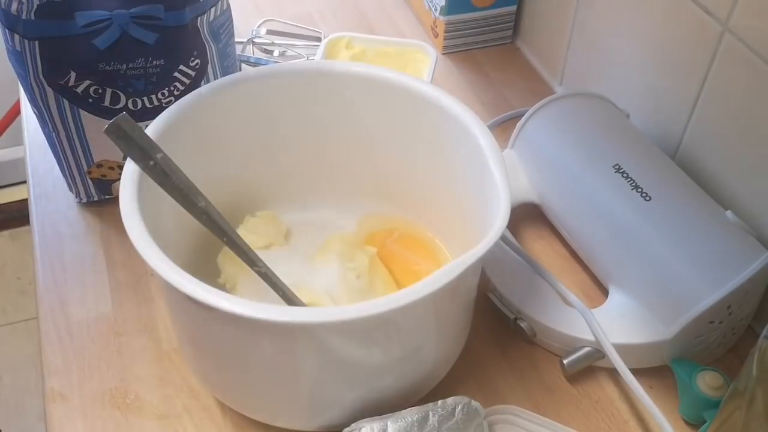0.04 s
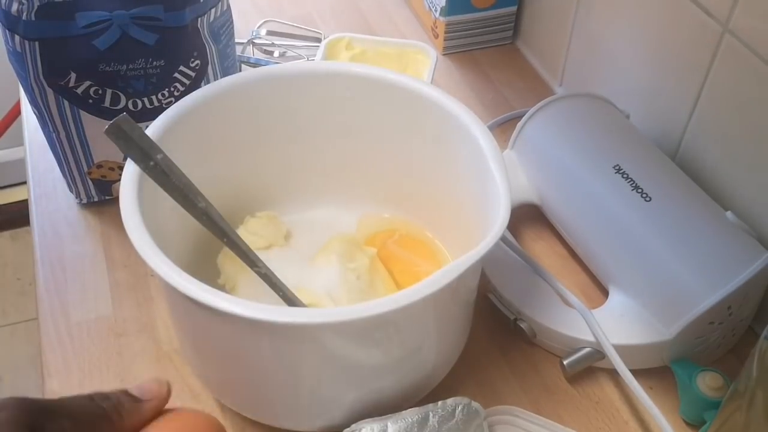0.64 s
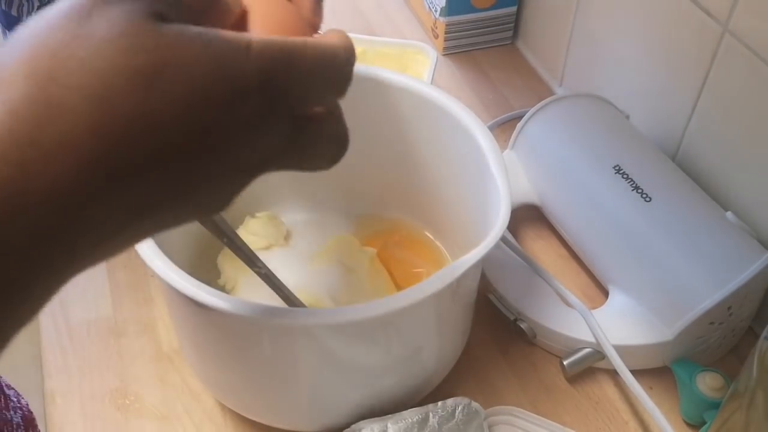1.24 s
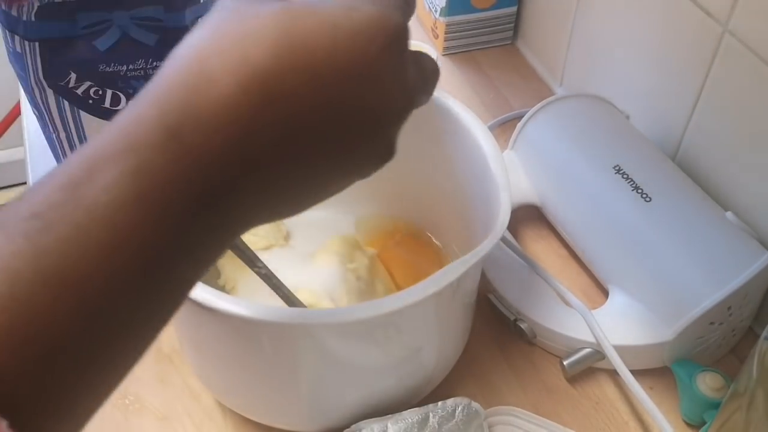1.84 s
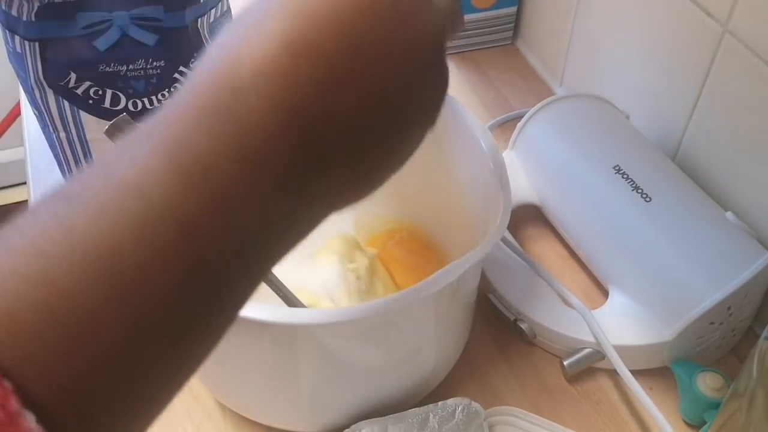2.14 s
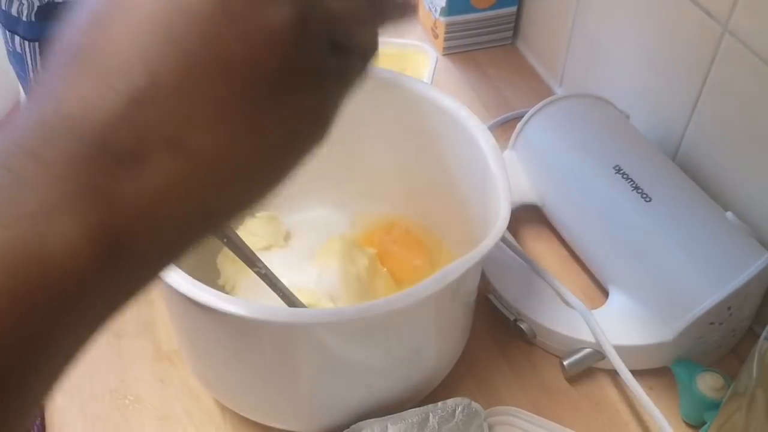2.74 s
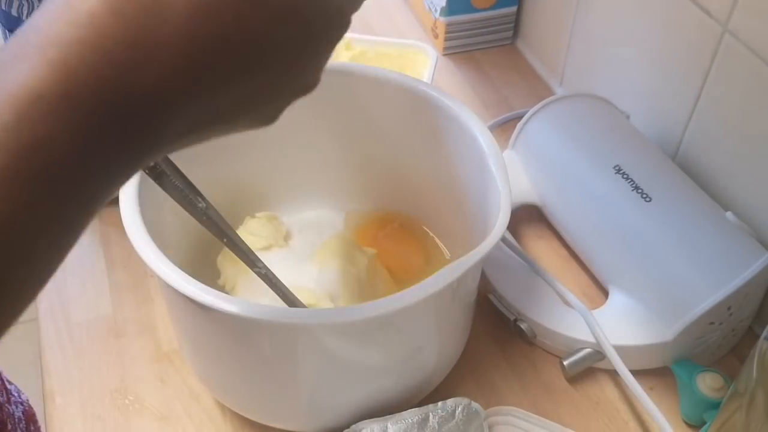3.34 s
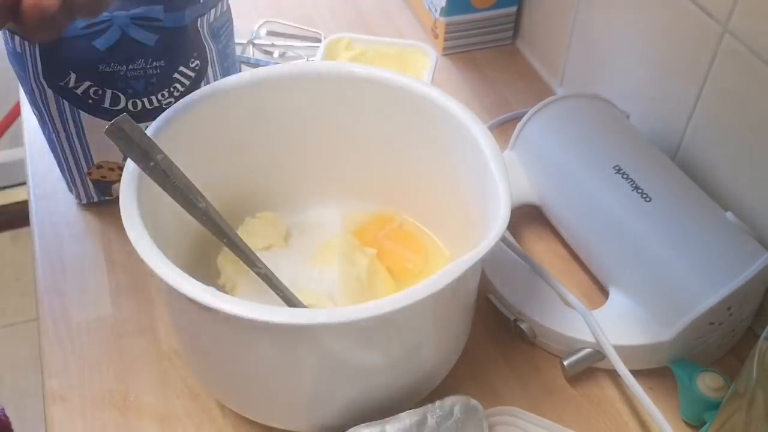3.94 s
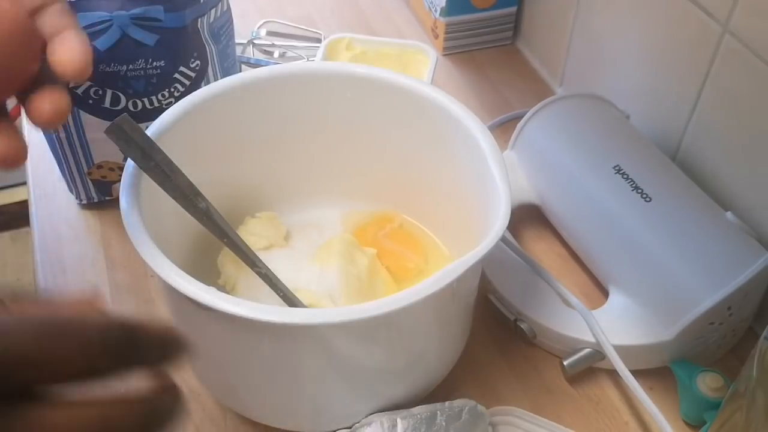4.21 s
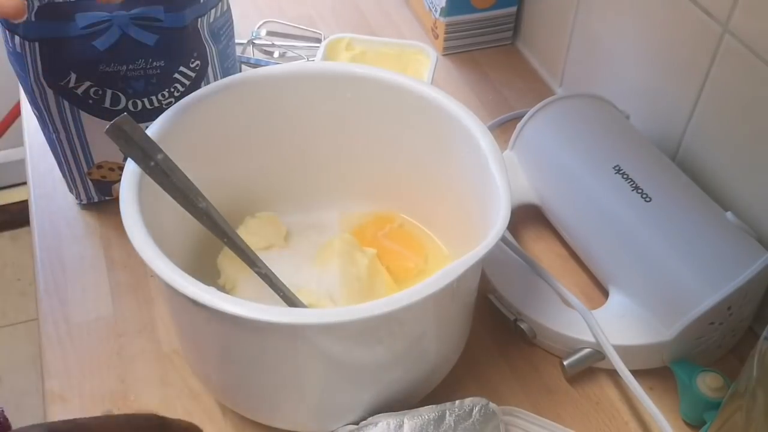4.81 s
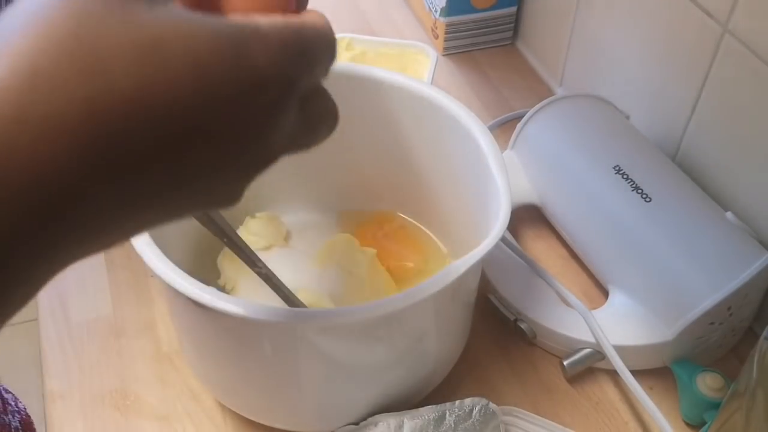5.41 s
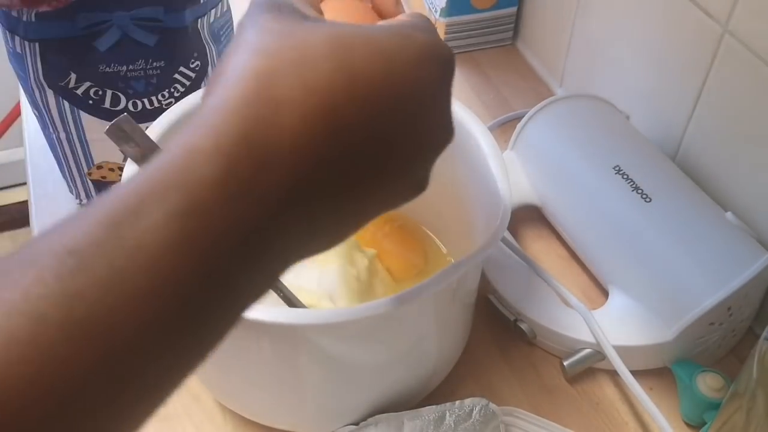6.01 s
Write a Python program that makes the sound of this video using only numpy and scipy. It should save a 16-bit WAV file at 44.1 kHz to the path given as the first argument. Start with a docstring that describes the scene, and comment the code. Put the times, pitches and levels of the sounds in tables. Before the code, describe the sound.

An egg hits a plastic bowl with a hard crack and a short hollow thud. Fine crumbling builds to a few crisp shell snaps, followed by a faint wet plop. Shells then rustle and crunch in an egg carton before another egg strikes the bowl and starts to break apart. The microphone is close, in a quiet kitchen with a short echo and a faint low rumble of movement.

```python
"""At a kitchen counter, close up, two eggs are knocked on the rim of a plastic mixing bowl, which rings and
rocks. Thumbs pry the first shell apart, the egg slops out, the halves crunch into the carton and the next
egg is taken. Every crackle is a burst of tiny fractures that also rings a small hollow. A short room tail
follows; underneath lie faint squeaks, room air and the low rumble of moving arms."""
import sys
import numpy as np
from scipy import signal
from scipy.fft import rfft, irfft
from scipy.io import wavfile

SR = 44100
rng = np.random.default_rng(int(sys.argv[2]) if len(sys.argv) > 2 else 0)


def transcribe(u):
    """Save the signal u as a 16-bit wav file named by the first command-line argument.

    u: samples, shape (n,) or (channels, n), limited to [-1, 1]; the rate is SR.
    q: integer samples, one column per channel.
    """
    v = np.clip(np.atleast_2d(u).T, -1, 1)
    q = np.round(v * 32767).astype(np.int16)
    wavfile.write(sys.argv[1], SR, q)


N = 271656

# The tone of one eggshell fracture. Each row: frequency in Hz, gain in dB.
SHELL_COLOUR = [(100, -16), (400, -17), (700, -20), (1100, -2), (2000, -13), (3200, -2.5), (4700, 0),
                (6200, -2.5), (7500, -3), (10000, -4.5), (12500, -13), (15000, -17.5)]


def amp(db):
    """Decibels to gain."""
    return 10 ** (np.asarray(db) / 20)


def curve_at(points, hz):
    """A curve's value on a log-frequency axis."""
    point_hz, value = np.transpose(points)
    return np.interp(np.log(hz + 1), np.log(point_hz), value)


def add(mix, start, sound):
    """Lays a sound into the mix at a start in seconds."""
    part = mix[max(round(start * SR), 0):][:len(sound)]
    part += sound[:len(part)]


def coloured(x, gain_db):
    """Minimum-phase EQ, with one gain for each spectrum bin of x."""
    log_gain = np.log(amp(np.r_[gain_db, gain_db[-2:0:-1]]))
    return irfft(rfft(x) * np.exp(np.conj(signal.hilbert(log_gain)))[:len(gain_db)])


def band_energy(x, lo_hz, hi_hz):
    """Energy of x between two frequencies."""
    hz = np.fft.rfftfreq(len(x), 1 / SR)
    return 2 * np.sum(abs(rfft(x)[(hz > lo_hz) & (hz < hi_hz)]) ** 2) / len(x) + 1e-20


def noise(colour):
    """Steady noise of rms 1 with a given spectrum."""
    gain = amp(curve_at(colour, np.fft.rfftfreq(N, 1 / SR)))
    x = irfft(rfft(rng.standard_normal(N)) * gain, N)
    return x / x.std()


def room_air(level_db=-59):
    """The bed of a quiet kitchen, alike on both sides in the bass only."""
    # Each row: frequency in Hz, relative noise level in dB.
    colour = [(12, -28.5), (20, 4), (81, -13.5), (138, -7), (172, -19), (248, -24), (285, -30),
              (377, -20.5), (422, -34), (780, -32), (1260, -32.5), (2750, -32), (6010, -43), (11100, -42.5),
              (16000, -56)]
    side = signal.sosfilt(signal.butter(2, 350, "high", fs=SR, output="sos"), noise(colour))
    return amp(level_db) * (noise(colour) + np.array([side, -side]))


def fractures(length, unevenness_db, hardness, size=4096):
    """A burst of tiny breaks of very unequal size that swells fast and dies within about its length."""
    progress = np.arange(size) / SR / max(length, .001)
    breaks = rng.standard_normal(size) * amp(unevenness_db * np.minimum(rng.standard_normal(size), 2.5))
    breaks *= progress ** .3 * np.exp(-progress ** 2)
    for _ in range(hardness):
        # a hard, clean break has no pitch: each pass evens out its spectrum and keeps it short
        spectrum = rfft(breaks)
        breaks = irfft(spectrum / np.sqrt(abs(spectrum) + 1e-12)) * np.exp(-(progress / 2) ** 4)
    return breaks


def crunch(length, crackle_db, hollow_db, hollow_hz, colour_db, unevenness_db, hollow_q, hardness):
    """Fractures radiate directly as treble crackle and ring the hollow behind them in the mids."""
    breaks = fractures(length, unevenness_db, hardness)
    hz = np.fft.rfftfreq(len(breaks), 1 / SR) + 1
    crackle = coloured(breaks, colour_db(hz))
    # the more closed the hollow, the more it outweighs the crackle and the sharper it rings
    q = hollow_q * 2 ** ((hollow_db - crackle_db) / 22)
    detuning = q * (hz / hollow_hz - hollow_hz / hz)
    hollow = coloured(breaks, np.maximum(-20 * np.log10(1 + detuning ** 2), -70))
    crackle *= amp(crackle_db) / np.sqrt(band_energy(crackle, 3800, 15000))
    hollow *= amp(hollow_db) / np.sqrt(band_energy(hollow, 900, 3400))
    return (crackle + hollow) * np.sqrt(length * SR)


def handling(rows, colour, gain_db, unevenness_db, hollow_q, bright_db, flake_db=4.5):
    """A run of crunches; each flake has resonances of its own and one bright peak."""
    out = np.zeros(N)
    flake_hz = np.geomspace(600, 16000, 40)
    for start, length, crackle_db, hollow_db, hollow_hz, bright_hz in rows:
        flake = np.c_[flake_hz, flake_db * rng.uniform(-1, 1, len(flake_hz))]

        def colour_db(hz):
            peak_db = bright_db * np.exp(-(np.log2(hz / bright_hz) / 0.64) ** 2)
            return curve_at(colour, hz) + curve_at(flake, hz) + peak_db
        add(out, start, crunch(length, crackle_db, hollow_db, hollow_hz, colour_db,
                               unevenness_db, hollow_q, hardness=0))
    return amp(gain_db) * out


def snapping(snaps, grips):
    """Crunch rows for the loud snaps: each takes the hollow pitch and bright peak of the latest grip."""
    grip_changes = [grip[0] for grip in grips[1:]]
    return [(*snap, *grips[np.searchsorted(grip_changes, snap[0])][-2:]) for snap in snaps]


def crumbling(grips, spread_db, overlap, ends_db, count, spread_octaves=.1):
    """Rows of small random crunches through each grip, strongest midway where fingers press hardest."""
    rows = []
    for start, length, crackle_db, hollow_db, hollow_hz, bright_hz in grips:
        for k, (when, crackle, hollow, pitch) in enumerate(rng.uniform(-1, 1, (count, 4))):
            progress = (k + .5 + when / 2) / count
            press_db = ends_db * (2 * progress - 1) ** 2
            rows.append((start + progress * length, overlap * length / count,
                         crackle_db + press_db + spread_db * crackle,
                         hollow_db + press_db + spread_db * hollow,
                         hollow_hz * 2 ** (spread_octaves * pitch), bright_hz))
    return rows


def egg_carton():
    """Shells are pressed into the carton and an egg is pulled out: snaps, crumbling and dull bumps."""
    # The tone of one fracture. Each row: frequency in Hz, gain in dB.
    colour = [(100, -8), (400, -5.5), (650, -9.5), (1100, -0.5), (2000, -3.5), (3400, -0.5), (5000, 0.5),
              (7000, -5), (10000, -2.5), (12500, -11.5), (15000, -19.5)]
    # Shells and fingers in the carton. Each row: start and length in seconds, crackle and hollow
    # in relative dB, hollow pitch and bright peak in Hz.
    grips = [(0.0, 0.29, -66, -59.5, 2180, 7600), (3.459, .12, -60.5, -44.5, 2105, 6300),
             (3.579, .08, -50.5, -40, 1955, 6500), (3.7, 0.16, -55, -52.5, 1986, 7200),
             (4.12, 0.11, -68, -57, 2230, 5750), (4.23, .08, -59.5, -40.5, 1930, 5800),
             (4.309, .15, -58, -52, 2130, 10400), (4.546, 0.036, -50, -51, 2510, 4450)]
    # Shell and carton buckling. Each row: start and length in seconds, crackle and hollow in relative dB.
    snaps = [(0.011, .0015, -36.5, -34), (3.466, 0.0077, -44, -50), (3.472, .023, -39, -33),
             (3.491, .013, -35.5, -31), (3.595, .0033, -40, -39), (3.614, .0035, -39, -39),
             (3.622, .0044, -35, -21), (3.711, .006, -46.5, -66), (3.733, .0046, -43.5, -47),
             (3.7475, .005, -40, -36), (3.758, .01, -36.5, -38), (3.777, .003, -59, -31.5),
             (3.818, 0.0057, -45, -44.5), (3.828, .005, -42, -30.5), (3.962, .0024, -55.5, -49.5),
             (4.187, .0047, -44, -34.5), (4.199, .005, -39, -37.5), (4.211, 0.0045, -39.5, -40),
             (4.2385, .0024, -52, -24), (4.2455, 0.0024, -51, -34), (4.316, .005, -53, -33.5),
             (4.362, .01, -42, -36), (4.382, .004, -28.5, -46), (4.393, .0043, -32, -58),
             (4.426, 0.0066, -40, -32), (4.473, 0.0063, -51.5, -48), (4.556, .012, -47, -56),
             (4.601, 0.0023, -29.5, -41)]
    # Bumps of the carton's body. Each row: as for a snap, then hollow pitch in Hz.
    bumps = [(4.227, 0.0046, -39, -41, 677), (4.332, 0.0089, -49.5, -42.5, 1020),
             (4.404, .0045, -57, -42, 1090)]
    rows = snapping(snaps, grips) + crumbling(grips, spread_db=2, overlap=0.55, ends_db=-1.5, count=10)
    rows += [(*bump, 5500) for bump in bumps]  # bright peak in Hz
    return handling(rows, colour, gain_db=-0.5, unevenness_db=4.5, hollow_q=1.48, bright_db=5.5)


def mode(t, hz, t60):
    """One dying vibration."""
    return np.exp(-np.log(1000) * t / t60) * np.sin(2 * np.pi * hz * t)


def bowl_knocks(rock_hz=131, rock_t60=0.225, push_s=0.0018):
    """Each knock gives a short crush, rings the bowl and rocks it on its base; returns cracks and bowl."""
    # The two hardest are egg on rim and the faint one at 2.06 s is the egg brushing the rim; the others #
    # arrive through hand or counter. Each row: start and crush length in seconds, crack and hollow in #
    # relative dB, hollow pitch in Hz, rocking, bottom and wall in relative dB, wall tilt in dB per octave.
    knocks = [(0.2064, 0.01, -52.5, -42, 2360, -36.5, -52, -55, 2.5),
              (0.706, 0.0038, -18, -18, 1940, -13, -46, -19, 0.5),
              (2.06, 0.011, -57, -74, 2000, -50.5, -55.5, -57.5, -2.5),
              (4.2256, .0016, -38, -13.5, 2010, -38, -49.5, -40.5, -1),
              (4.957, 0.0024, -14, -15, 2198, -26, -21.5, -26.5, -1.5)]
    # The tone of a crack on the rim. Each row: frequency in Hz, gain in dB.
    colour = [(100, -12.5), (300, 8), (650, -8.5), (1100, 5.5), (2000, 1.5), (3900, -1), (4800, 5),
              (6300, -4.5), (7500, 0.5), (8200, -8.5), (9800, -3.5), (12000, -16), (15000, -24)]
    # The ring of the wall. Each row: frequency in Hz, relative level in dB, T60 in seconds.
    wall_modes = [(90.1, -11, 0.19), (115, -14, .15), (154, -2.5, 0.17), (224, -10.5, 0.13),
                  (291, -10, 0.12), (397, -22, 0.16), (568, -10, 0.11), (805, -23.5, 0.26),
                  (968.6, -19.5, 0.27), (1039, -5, 0.14), (1182, -15, .18), (1374, -26, 0.12),
                  (1595, -12, 0.12), (1680, -15, 0.18), (1934, -13, 0.24), (2080, -19, 0.11),
                  (2473, -14.5, 0.22), (2580, -11.5, 0.25), (2665, -15, 0.17), (3110, -14.5, 0.16)]
    cracks, bowl = np.zeros((2, N))
    t = np.arange(SR // 2) / SR
    # it rocks a little faster the other way, so the two beat
    rock = mode(t, rock_hz, rock_t60) + amp(-15) * mode(t, rock_hz + 2.5, rock_t60)
    bottom = mode(t, hz=185.8, t60=.15)  # the loaded bottom drumming
    attack = 1 - np.exp(-t / push_s)
    for start, length, crack_db, hollow_db, hollow_hz, rock_db, bottom_db, wall_db, tilt_db in knocks:
        add(cracks, start, crunch(length, crack_db, hollow_db, hollow_hz, lambda hz: curve_at(colour, hz),
                                  unevenness_db=4, hollow_q=1.34, hardness=2))
        # neighbouring modes move the wall in opposite senses
        wall = sum((-1) ** k * amp(db + tilt_db * np.log2(hz / 1000)) * mode(t, hz, t60)
                   for k, (hz, db, t60) in enumerate(wall_modes))
        add(bowl, start, (amp(rock_db) * rock + amp(bottom_db) * bottom + amp(wall_db) * wall) * attack)
    return cracks, bowl


def arm_rumble():
    """A low rumble swells with each sweep of the arms."""
    # Each row: middle and half-length in seconds, level in dB.
    sweeps = [(0.39, 0.054, -51.5), (0.723, .05, -57), (2.2, 0.32, -58.5), (3.55, 0.56, -55),
              (4.316, .1, -45), (4.849, 0.095, -53), (5.473, 0.37, -49.5)]
    # Each row: frequency in Hz, relative noise level in dB.
    colour = [(10, -13), (27, -2), (42, -14.5), (60, -16), (100, -31), (300, -43.5), (1000, -91)]
    t = np.arange(N) / SR
    motion = sum(amp(db) * np.exp(-((t - middle) / half) ** 2) for middle, half, db in sweeps)
    return motion * noise(colour)


def eggshell():
    """Thumbs pry a shell apart: a few loud snaps amid fine crumbling."""
    # What the fingers hold colours every snap in that grip. Each row: start and length in seconds,
    # crackle and hollow in relative dB, hollow pitch and bright peak in Hz.
    grips = [(0.82, .07, -55, -68, 2290, 6900), (1.756, 0.23, -65, -73, 2200, 8400),
             (2.003, 0.16, -54, -53, 2200, 7260), (3.081, 0.13, -58, -50, 2390, 5850),
             (3.26, 0.14, -61.5, -61, 2240, 6350), (5.73, .2, -55.5, -59.5, 2370, 6920),
             (6.081, 0.086, -46, -51.5, 3050, 6540)]
    # The shell giving way. Each row: start and length in seconds, crackle and hollow in relative dB.
    snaps = [(1.802, .004, -59.5, -68), (1.921, 0.0057, -41, -50), (1.93, 0.0019, -40, -48),
             (1.982, .0035, -51.5, -51), (2.011, 0.0039, -33, -44), (2.033, 0.0043, -35, -38),
             (2.065, 0.0071, -46, -58), (2.085, .0065, -39.5, -58), (2.098, 0.0066, -31, -41.5),
             (2.111, 0.0039, -26, -44), (2.1155, 0.001, -13.5, -38), (2.123, 0.0012, -19.5, -31),
             (3.0995, 0.0044, -45.5, -34.5), (3.116, 0.015, -49, -41), (3.168, 0.0035, -45.5, -38),
             (3.18, 0.0048, -44.5, -37.5), (3.2, 0.0073, -43.5, -36), (3.389, 0.0045, -63, -51.5),
             (5.735, 0.0026, -49.5, -41), (5.785, 0.0028, -46, -54.5), (5.915, 0.0023, -41.5, -49),
             (5.924, 0.0046, -39.5, -38.5), (6.001, 0.0048, -39.5, -52), (6.1145, 0.0079, -35.5, -31.5),
             (6.147, 0.0016, -35, -31)]
    rows = snapping(snaps, grips) + crumbling(grips, spread_db=5, overlap=0.51, ends_db=-5, count=11)
    return handling(rows, SHELL_COLOUR, gain_db=-2.0, unevenness_db=3.5, hollow_q=1.9, bright_db=4.5)


def wet_egg(bright_hz=6960):
    """White and yolk slop out of the opened shell."""
    # Each row: start and length in seconds, crackle and hollow in relative dB, hollow pitch in Hz.
    slops = [(2.25, 0.0097, -60.5, -53, 2200), (2.281, 0.04, -59, -50, 1820),
             (2.325, .005, -41.5, -37.5, 1620), (2.338, 0.048, -61, -54, 1860),
             (2.385, .008, -56, -51, 2470), (2.457, 0.012, -64, -58.5, 2150)]
    rows = [(*slop, bright_hz) for slop in slops]
    return handling(rows, SHELL_COLOUR, gain_db=0.0, unevenness_db=8.0, hollow_q=1.25, bright_db=1.5)


def squeaks(half_width_hz=220):
    """Faint, fuzzy whistles of narrow-band noise that start quickly and fade."""
    # Each row: start and length in seconds, pitch in Hz, relative level in dB.
    cues = [(2.376, 0.043, 2790, -52), (2.53, 0.23, 3534, -68.5), (2.879, 0.12, 3980, -68.5),
            (5.281, .07, 3470, -64)]
    out = np.zeros(N)
    lowpass = signal.butter(2, half_width_hz, fs=SR)
    for start, length, hz, db in cues:
        t = np.arange(int(length * SR)) / SR
        fuzz = signal.lfilter(*lowpass, rng.standard_normal(len(t)) + 1j * rng.standard_normal(len(t)))
        whistle = (fuzz * np.exp(2j * np.pi * hz * t)).real
        add(out, start, amp(db) * whistle / whistle.std() * np.sin(np.pi * np.sqrt(t / length)))
    return out


def close_echoes(x, scatter_db, fade_s, count=24):
    """Bowl, hands and counter return the treble within milliseconds, differently on each side."""
    echoes = np.zeros((2, 1024))
    for side in echoes:
        delay_s = (np.arange(count) + rng.random(count)) / count * .014 + .001
        side[(delay_s * SR).astype(int)] = rng.choice([-1, 1], count) * np.exp(-delay_s / fade_s)
    echoes *= amp(scatter_db) / np.linalg.norm(echoes, axis=1, keepdims=True)
    echoes = signal.sosfilt(signal.butter(1, 400, "high", fs=SR, output="sos"), echoes)
    return (x + signal.oaconvolve(x[None], echoes, axes=1)[:, :N]) / np.sqrt(1 + amp(scatter_db) ** 2)


def kitchen_tail(x, build_s=0.0033):
    """A dense tail off tiles and cupboards, each band dying at its own speed; thin in the bass."""
    # Each row: frequency in Hz, T60 in seconds.
    decay_times = [(120, 0.36), (500, .28), (2000, 0.28), (4000, 0.23), (8000, 0.27), (15000, 0.16)]
    hz, t, bands = signal.stft(rng.standard_normal((2, SR // 2)), SR, nperseg=256)
    decay = np.exp(-np.log(1000) * t / curve_at(decay_times, hz)[:, None])
    tail = signal.istft(bands * decay, SR, nperseg=256)[1]
    tail *= 1 - np.exp(-(np.arange(tail.shape[1]) / SR / build_s) ** 2)
    tail = signal.sosfilt(signal.butter(1, 200, "high", fs=SR, output="sos"), tail)
    return signal.fftconvolve(x[None], tail / np.linalg.norm(tail[0]), axes=1)[:, :N]


def microphone_ports(x):
    """The two microphone ports hear the bass alike and the treble out of step."""
    # Each row: frequency in Hz, lead of left over right in radians.
    left_lead = [(100, .05), (180, .2), (300, 1.3), (600, 1.9), (2000, 1.93), (4000, 1.78), (15000, 1.6)]
    phase = curve_at(left_lead, np.fft.rfftfreq(N, 1 / SR)) / 2
    return irfft(rfft(x) * np.exp(1j * np.array([phase, -phase])), N)


def to_the_right(x):
    """The action sits slightly right of centre."""
    # Each row: frequency in Hz, left minus right in dB.
    balance = [(150, 1), (300, -3.5), (1000, -3), (2000, -6), (4000, -0.5), (8000, -2.5), (12000, -4)]
    left_db = curve_at(balance, np.fft.rfftfreq(N, 1 / SR)) / 2
    return irfft(rfft(x) * amp([left_db, -left_db]), N)


def scene():
    """Shells, cracks and bowl with their close echoes and room tail, over air and rumble."""
    cracks, bowl = bowl_knocks()
    shells = eggshell() + wet_egg() + egg_carton() + squeaks()
    close = bowl + close_echoes(shells, scatter_db=-1.5, fade_s=0.0073)
    close += close_echoes(cracks, scatter_db=-3.5, fade_s=0.0023)
    room = kitchen_tail(amp(-10.0) * shells + amp(-7.0) * cracks + amp(-22.0) * bowl)
    return to_the_right(microphone_ports(close) + room) + room_air() + arm_rumble()


def record(dry):
    """A soft clip rounds off the hardest crack; a steep low-pass trims the very top."""
    ceiling, cutoff_hz = .85, 15600
    rounded = dry / (1 + (dry / ceiling) ** 4) ** .25
    lowpass = signal.firwin(511, cutoff_hz, window=("kaiser", 8), fs=SR)
    return signal.oaconvolve(rounded, lowpass[None], "same")


dry = scene()
out = record(dry)
transcribe(out)
```